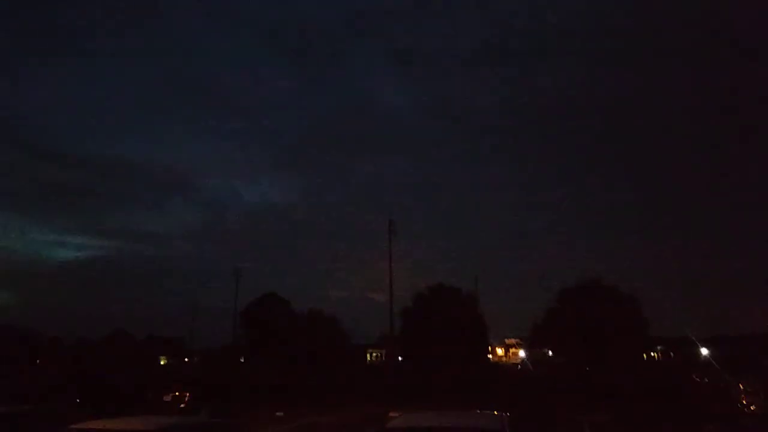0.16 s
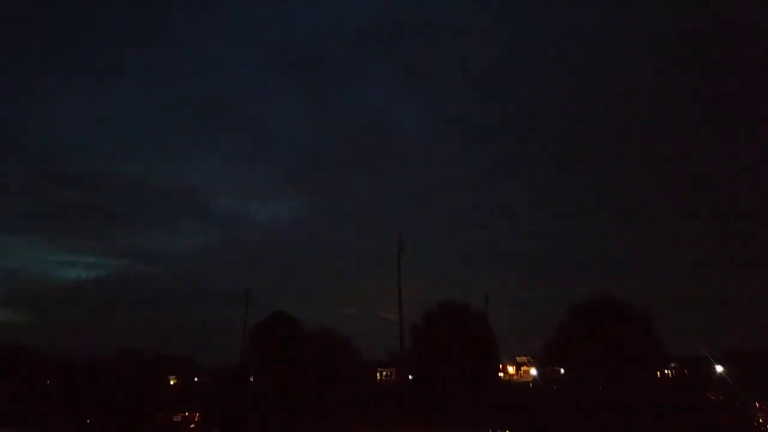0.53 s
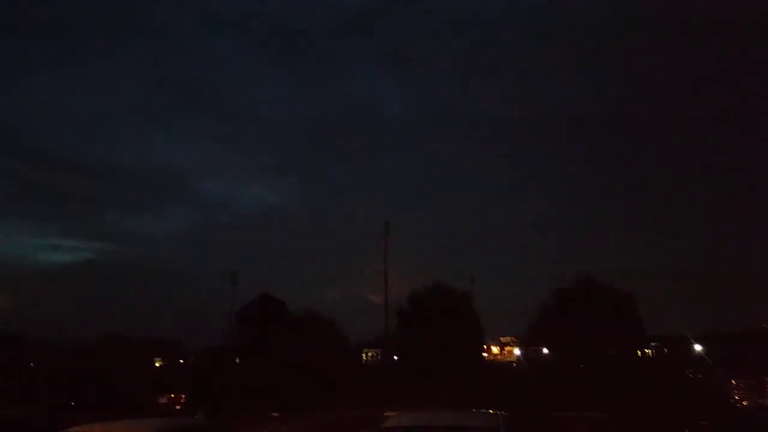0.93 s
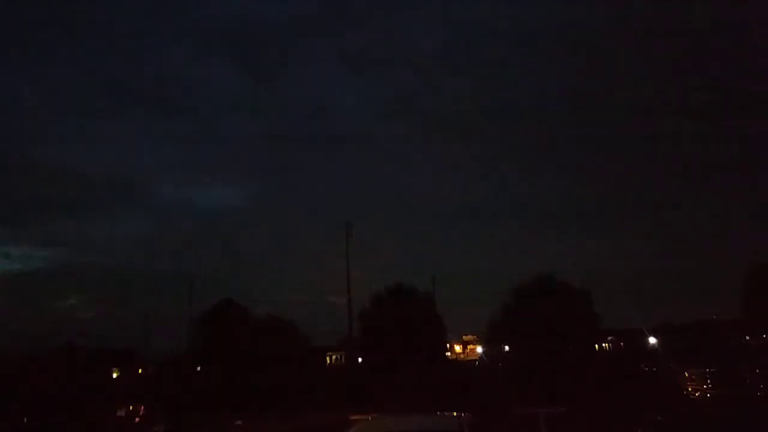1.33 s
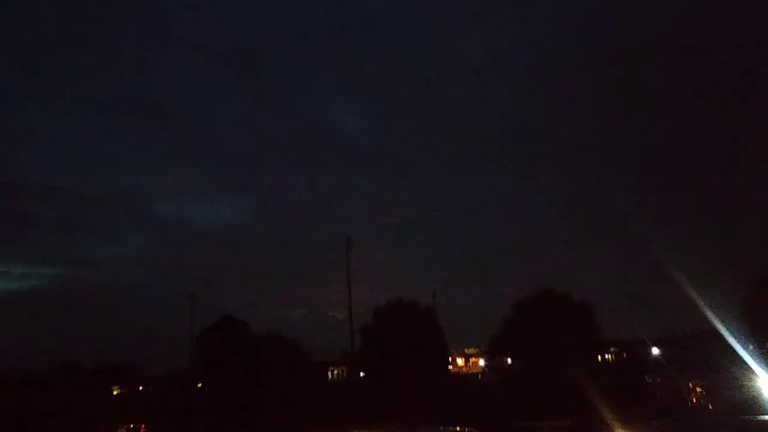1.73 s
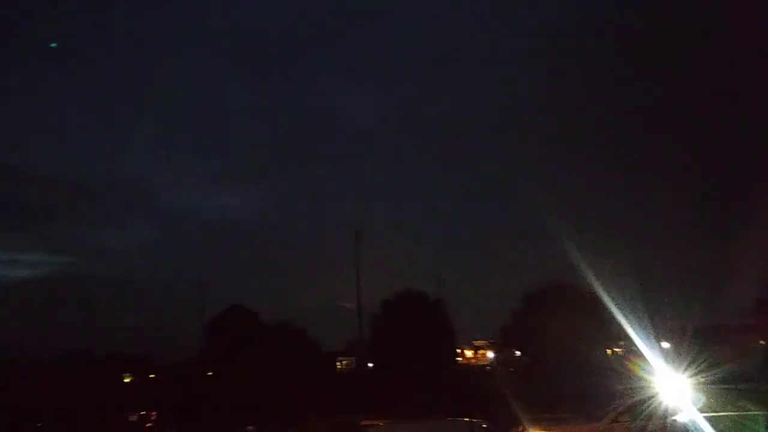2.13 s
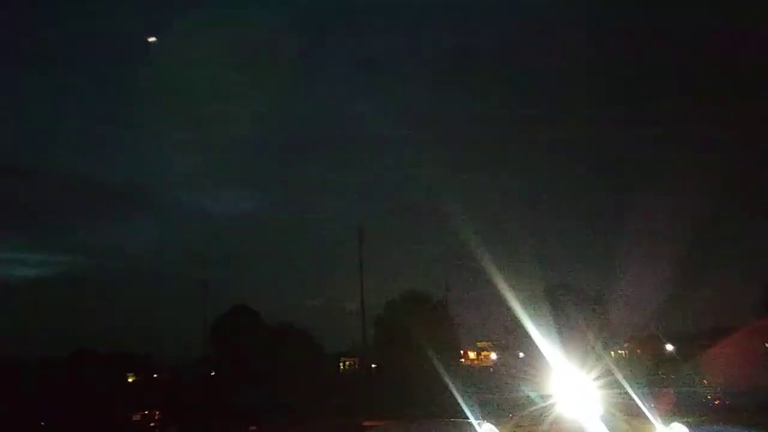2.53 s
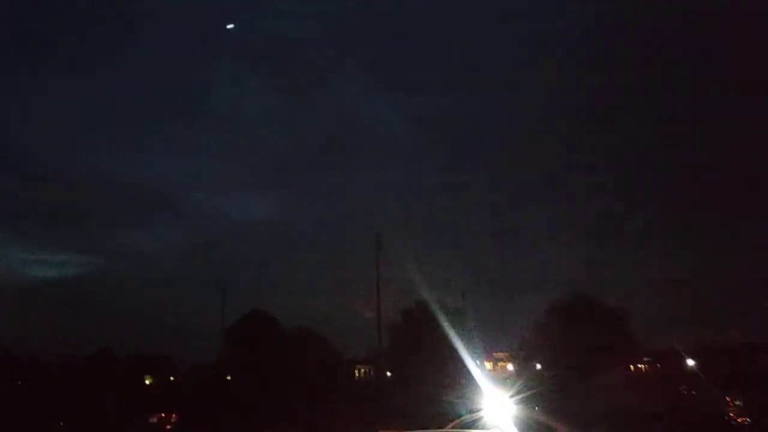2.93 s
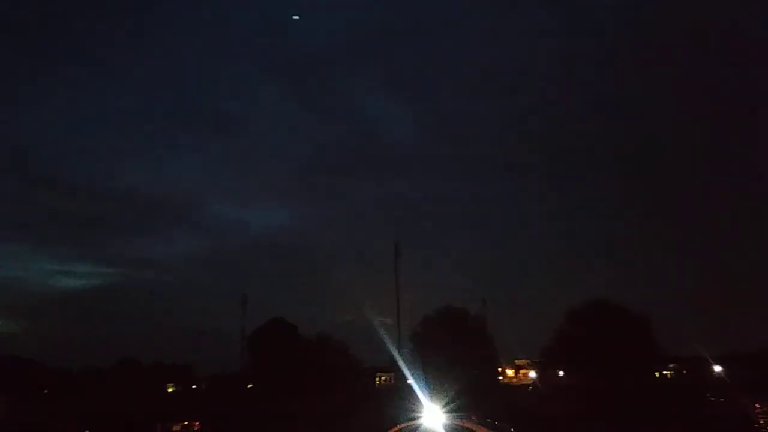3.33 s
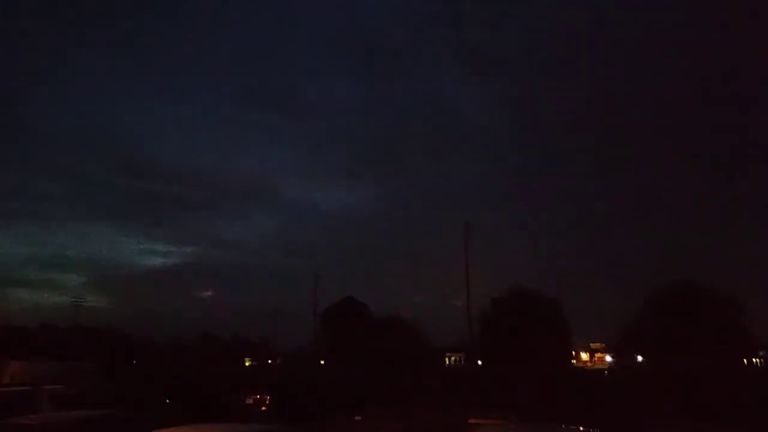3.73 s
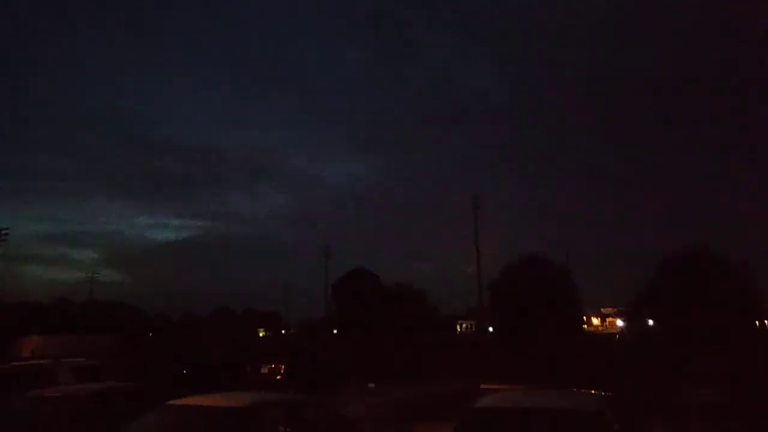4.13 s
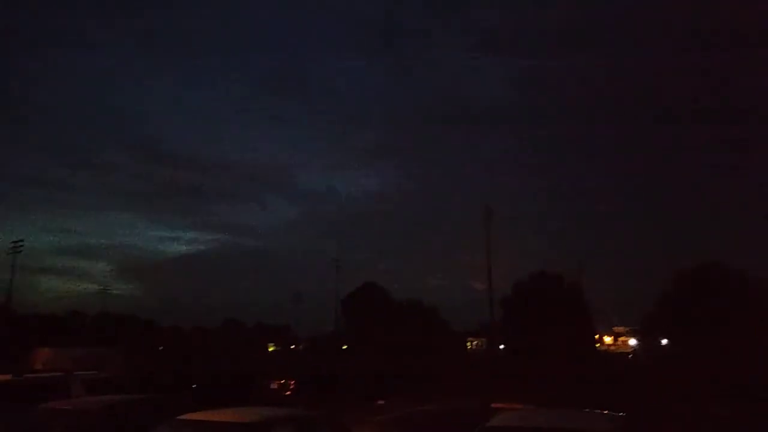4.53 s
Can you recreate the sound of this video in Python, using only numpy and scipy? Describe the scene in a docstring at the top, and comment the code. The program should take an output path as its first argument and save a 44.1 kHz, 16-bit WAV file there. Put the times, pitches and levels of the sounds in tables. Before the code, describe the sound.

Night insects fill the open air with a steady high shrill and short, pulsing cricket trills. Far traffic murmurs very low beneath them. A few small, sharp handling clicks come early. Near the end a brief crackly rustle and an insect buzz are followed by the loudest sound, a short scraping crack right on the microphone, after which the chorus continues dulled.

```python
"""A far chorus of crickets and katydids shrills at dusk over a faint town hum and calls, likely frogs.
The insects stridulate, drawing a scraper over a file on the wing; one katydid buzzes twice close by.
A hand-held camera bumps, rustles and ticks as contacts excite the modes of its casing. Near the end
something, probably a fingertip, scrapes across the microphone port in stick-slip motion with a sharp
crack and stays there, muffling the night."""
import sys
import numpy as np
from scipy import signal
from scipy.fft import rfft, irfft, next_fast_len
from scipy.io import wavfile
from scipy.ndimage import uniform_filter1d

SR = 44100
rng = np.random.default_rng(int(sys.argv[2]) if len(sys.argv) > 2 else 0)


def pcm_store(signal):
    """Save signal as 16-bit PCM."""
    levels = np.round(np.clip(np.atleast_2d(signal), -1, 1) * 32767)
    wavfile.write(sys.argv[1], SR, levels.astype(np.int16).T)


N = 205991
TIME = np.arange(N) / SR
COVER_S = 4.26  # the port starts to close


def undb(db):
    """Decibels to amplitude ratio."""
    return 10 ** (np.asarray(db) / 20)


def unit(x):
    """Normalisation to rms 1."""
    return x / np.sqrt(np.mean(x ** 2) + 1e-20)


def gains(table):
    """Interpolation in time: one gain curve for each dB column of a table."""
    s, *columns = np.transpose(table)
    return [undb(np.interp(TIME, s, column)) for column in columns]


def colour(x, points):
    """Minimum-phase filter through (frequency_hz, gain_db) points, by folding the cepstrum."""
    size = next_fast_len(N // 2 + SR // 4) * 2
    hz, db = np.transpose(points)
    bins_hz = np.maximum(np.fft.rfftfreq(size, 1 / SR), 1)
    cepstrum = irfft(np.log(undb(np.interp(np.log(bins_hz), np.log(hz), db))))
    cepstrum[1:size // 2] *= 2
    cepstrum[size // 2 + 1:] = 0
    return irfft(rfft(x, size) * np.exp(rfft(cepstrum)))[:N]


def band(x, low_hz, high_hz, order=4):
    """Band-pass filter, normalised to rms 1."""
    sos = signal.butter(order, [low_hz, high_hz], "band", fs=SR, output="sos")
    return unit(signal.sosfilt(sos, x))


def noise():
    """White noise."""
    return rng.standard_normal(N)


def walk(per_s):
    """Smooth random modulation of rms 1, turning about per_s times a second."""
    step = max(int(SR / per_s), 1)
    return unit(uniform_filter1d(noise()[np.arange(N) // step], step))


def grains(per_s, scatter_db):
    """Shot noise: random impulses of uneven size."""
    return unit((rng.random(N) < per_s / SR) * np.sign(noise()) * undb(scatter_db * noise()))


def tone(hz):
    """A sinusoid whose phase is the integral of its frequency."""
    return np.sin(2 * np.pi * np.cumsum(hz) / SR)


def swell(centre_s, length_s):
    """A bell-shaped envelope."""
    return np.exp(-(2 * (TIME - centre_s) / length_s) ** 2)


def ramp(start_s, length_s):
    """A linear rise from 0 to 1."""
    return np.clip((TIME - start_s) / length_s, 0, 1)


def burst(start_s, t60_s, attack_s=0.0022):
    """A quick attack and an exponential decay."""
    return ramp(start_s, attack_s) * undb(-60 * np.maximum(TIME - start_s, 0) / t60_s)


def notes(table, bend_hz):
    """Tones under bell-shaped envelopes, sharing one frequency modulation."""
    out = np.zeros(N)
    for centre_s, length_s, pitch_hz, level_db in table:
        on = np.abs(TIME - centre_s) < 1.5 * length_s
        out[on] += undb(level_db) * swell(centre_s, length_s)[on] * tone(pitch_hz + bend_hz[on])
    return out


def resonator(x, hz, t60_s):
    """Forced response of a damped oscillator whose natural frequency moves."""
    turn = np.exp(2j * np.pi * np.cumsum(hz) / SR)
    pole = undb(-60 / (t60_s * SR))
    return (signal.lfilter([1], [1, -pole], x / turn) * turn).imag


def struck(modes, age_s, detune):
    """Free vibration after an impact: a sum of damped modes, each randomly detuned."""
    out = 0
    for mode_hz, level_db, t60_s in modes:
        hz = mode_hz * (1 + detune * rng.standard_normal())
        out += undb(level_db - 60 * age_s / t60_s) * np.sin(2 * np.pi * hz * age_s)
    return out


def outdoors(x, wet_db, t60_s):
    """Scattering from trees and houses adds a diffuse, decaying tail."""
    t = TIME[:SR // 2]
    tail = noise()[:len(t)] * undb(-60 * t / t60_s)
    return x + undb(wet_db) * signal.fftconvolve(x, tail / np.linalg.norm(tail))[:N]


def town():
    """Far traffic sums incoherently to a low murmur, beside a machine's tonal hum and a faint hiss."""
    # traffic spectrum: frequency_hz, gain_db
    murmur = [(15, -51.5), (25, -26), (112, -8.5), (240, -5.5), (262, -11.5), (301, -4), (429, -10.5),
              (579, -13), (691, -16.5), (1070, -15), (1240, -21.5), (1380, -23.5), (1700, -22), (2210, -46),
              (3740, -120)]
    # partials of the machine: pitch_hz, level_db
    partials = [(118.4, -71.5), (236.9, -65.5)]
    traffic = unit(colour(noise(), murmur)) * undb(-61.5 + 0.43 * walk(6.7))
    hum = sum(undb(db) * np.sqrt(2) * tone(hz + .5 * walk(4.34)) for hz, db in partials)
    return traffic + hum + undb(-66) * band(noise(), 1300, 3080, order=2)


def far_calls(peep_count=36, peep_db=-67, flutter_db=3, waver_hz=45):
    """Random modulation roughens short calls and fainter peeps; reverberation blurs them."""
    # far calls, likely frogs: centre_s, length_s, pitch_hz, level_db
    calls = [(0.127, 0.29, 1430, -57.5), (.47, 0.25, 1420, -59), (.59, .04, 600, -60),
             (1.642, 0.09, 561, -53), (1.78, 0.051, 516, -54), (1.89, 0.04, 620, -60),
             (2.047, 0.086, 1582, -57), (2.45, 0.035, 912, -57), (2.602, 0.057, 1397, -51),
             (2.71, 0.043, 1440, -60), (2.876, 0.023, 1430, -57), (3.197, 0.035, 1053, -54),
             (3.23, 0.047, 322, -52), (3.416, 0.064, 1068, -62), (3.54, 0.021, 1610, -58),
             (4.59, 0.045, 318.7, -51.5), (4.644, 0.032, 581, -47.5)]
    peeps = [(when * TIME[-1], .04, 1750 - 850 * low ** 2, peep_db + 5 * near)
             for when, low, near in rng.random((peep_count, 3))]
    voices = notes(list(calls) + peeps, waver_hz * walk(220))
    flutter = unit(undb(flutter_db * walk(170)))
    return outdoors(voices * flutter, wet_db=-6, t60_s=0.35)


def cricket_choir(carrier_hz, spread_hz, hoarse_hz, strokes_per_s, uneven_db, singers=5):
    """Stridulation: each singer has its own pitch, modulated by wing strokes and short uneven chirps."""
    out = 0
    for place in np.linspace(-1, 1, singers):
        stroke_hz = strokes_per_s * (1 + .15 * rng.standard_normal() + .25 * walk(40))
        stroke = (np.cumsum(stroke_hz) / SR + rng.random()) % 1
        bend_hz = 30 * walk(18) + hoarse_hz * walk(260) - 40 * (stroke - .5)
        chirps = undb(uneven_db * np.tanh(1.3 * walk(18)) - 3 * abs(place))
        throb = .2 + np.sin(np.pi * stroke)
        out += throb * chirps * tone(carrier_hz + spread_hz * place + bend_hz)
    far = outdoors(out, wet_db=-7, t60_s=.12)
    return far / np.sqrt(uniform_filter1d(far ** 2, SR // 8) + 1e-12)  # holds the level steady


def crickets(swell_db=1.2, swells_per_s=9):
    """Common modulation: five choirs follow one effort, the high ones most, and each swells a little."""
    # how eagerly the crickets sing: time_s, effort_db
    eagerness = [(0, 5), (.25, 5), (.75, 0), (1.15, -1.5), (1.55, -1.5), (2.15, -2), (2.88, 1), (2.98, -7),
                 (3.64, -11.5), (3.72, 1.5), (4.15, -1), (4.6, 0)]
    # choirs: carrier_hz, spread_hz, hoarse_hz, strokes_per_s, uneven_db, level_db, db_per_effort_db
    choirs = [(1919, 100, 38, 52, 8.5, -53.5, 0.14), (2347, 110, 30, 66, 15, -59.7, .5),
              (2614, 125, 27.44, 51, 13.5, -60.5, 0.47), (3126, 280, 40, 57, 15, -59.7, 1.06),
              (3670, 240, 41, 58, 16, -67, 1.36)]
    effort, = gains(eagerness)
    return sum(undb(db + swell_db * walk(swells_per_s)) * effort ** by_effort * cricket_choir(*choir)
               for *choir, db, by_effort in choirs)


def near_crickets(strokes_per_s=57, hoarse_hz=32, waver_hz=30, sag_hz=60, uneven_db=2.0):
    """Single crickets trill above the choirs: each wing stroke radiates a pulse of sagging pitch."""
    # trills: centre_s, length_s, pitch_hz, level_db
    trills = [(0.064, 0.049, 3430, -66), (0.218, .12, 3260, -51.5), (0.316, 0.4, 2736, -53),
              (0.422, 0.085, 2290, -51), (0.597, 0.18, 3253, -55), (0.636, 0.11, 1883, -49),
              (0.724, .05, 2420, -55), (0.823, .06, 3290, -58), (0.988, .1, 2330, -61),
              (1.09, .07, 3140, -55), (1.09, .06, 2410, -56), (1.198, 0.096, 2330, -51.5),
              (1.212, 0.064, 3720, -57), (1.31, 0.036, 3470, -59), (1.379, .07, 2670, -55),
              (1.469, 0.054, 3090, -57), (1.643, .05, 2990, -54), (1.66, 0.051, 3350, -63),
              (1.775, .08, 2360, -53), (1.812, 0.16, 2663, -52.5), (1.969, .05, 2650, -56.5),
              (2.104, 0.16, 2340, -53), (2.112, .035, 3100, -53), (2.189, 0.24, 2657, -53),
              (2.237, 0.048, 3570, -62), (2.272, 0.12, 3270, -61), (2.346, .05, 1960, -47),
              (2.511, 0.17, 2324, -50.5), (2.537, 0.109, 3260, -56.5), (2.56, .08, 3120, -63),
              (2.751, 0.036, 2704, -50), (2.82, .06, 2490, -54), (2.865, 0.16, 2660, -51.5),
              (3.08, 0.051, 3420, -64), (3.091, 0.1, 2640, -56.5), (3.39, .06, 2630, -60),
              (3.481, .06, 2420, -63), (4.02, .05, 2600, -59), (4.02, .1, 3450, -58),
              (4.153, .07, 2600, -58)]
    stroke = np.cumsum(strokes_per_s * (1 + .2 * walk(40))) / SR % 1
    bend_hz = waver_hz * walk(18) + hoarse_hz * walk(260) - sag_hz * (stroke - .5)
    throb = np.sqrt(2) * unit((.2 + np.sin(np.pi * stroke)) * undb(uneven_db * walk(30)))
    return outdoors(notes(trills, bend_hz) * throb, wet_db=-7, t60_s=.12)


def katydids_and_fizz(throb_db=0.4):
    """Superposition: below 11 kHz countless file-tooth strikes merge into the katydids' shrill.
    Above it a very faint high fizz comes and goes as the chorus brightens."""
    # course of the chorus: time_s, effort_db, brightness_db
    course = [(0, -2.5, -11.5), (.5, -1, -7.5), (.85, 0, -3), (1.9, 0, -2.5), (2.35, 0.5, 0),
              (2.7, 0.2, -0.7), (3.05, -2, 0.55), (3.55, -2, -0.5), (3.85, -6.5, 0.5), (4.2, -5.5, 0)]
    # spectrum ahead of the split into bands: frequency_hz, gain_db
    spectrum = [(2180, -44.5), (3700, -9), (3810, -24.5), (3950, -0.5), (4180, -1), (5380, -1),
                (7010, -1.5), (8700, -11.5), (10100, -13.5), (11200, -29.5), (13100, -50.5), (14200, -43),
                (15000, -46)]
    # four bands of shrill, then the fizz: low_hz, high_hz, level_db, db_per_effort_db, db_per_bright_db
    bands = [(4018, 4800, -52.5, 1.3, -0.31), (4747, 6048, -48.5, 1.1, 0), (6220, 8880, -48, 0, 1.0),
             (8750, 11000, -59.5, 0, 1.5), (10850, 13650, -65, 0, 5.5)]
    shot_noise = colour(grains(per_s=14000, scatter_db=2.0), spectrum) * undb(throb_db * walk(130))
    effort, brightness = gains(course)
    return sum(undb(db) * effort ** by_effort * brightness ** by_brightness
               * band(shot_noise, low_hz, high_hz, order=10)
               for low_hz, high_hz, db, by_effort, by_brightness in bands)


def near_katydid(carrier_hz=7720, fall_hz=1000, strokes_per_s=136, rasp_db=-18, wobble_hz=80):
    """A pulse train heard as a buzz: each wing stroke is a falling ping with the rasp of the file."""
    # buzzes: start_s, length_s, fade_s, first_db, last_db
    buzzes = [(.19, .225, .07, -54.5, -55.5), (3.642, 0.203, .012, -42, -36.5)]
    out = 0
    for start_s, length_s, fade_s, first_db, last_db in buzzes:
        stroke = np.cumsum((TIME > start_s) * strokes_per_s * (1 + .04 * walk(60))) / SR % 1
        pitch_hz = carrier_hz - fall_hz * (stroke - .5) + wobble_hz * walk(900)
        wing = np.sqrt(2) * tone(pitch_hz) + undb(rasp_db) * band(noise(), 7900, 8300, order=5)
        pings = 2 * np.sin(np.pi * stroke) ** 4 * wing * undb(walk(110))
        along = (TIME - start_s) / length_s
        edges = np.clip(np.minimum(along, 1 - along) * length_s / fade_s, 0, 1)
        out += pings * edges * undb(np.interp(along, [0, 1], [first_db, last_db]))
    return outdoors(out, wet_db=-7, t60_s=.11)


def hand_bumps():
    """Structure-borne sound: the hand bumps the camera, giving dull swells of low noise."""
    # bumps: centre_s, length_s, level_db
    bumps = [(0.238, 0.091, -54), (1.45, 0.092, -60), (1.81, 0.37, -61.5), (2.12, 0.17, -50.5),
             (2.625, 0.15, -59), (3.088, 0.11, -57), (4.38, 0.1, -51.5)]
    force = sum(undb(db) * swell(s, length_s) for s, length_s, db in bumps)
    return force * band(noise(), 97.5, 168, order=2)


def rustle(fade_after_s=0.3, sizzle_db=-43.5):
    """Decaying shot noise: a sudden grainy rustle of handling, with a thin spray of treble."""
    # hollow body and crisp top: start_s, low_hz, high_hz, level_db, t60_s
    layers = [(3.656, 480, 1860, -46.5, 0.48), (3.645, 1710, 3840, -45, 1.8)]
    # spectrum of a grain: frequency_hz, gain_db
    grain_spectrum = [(240, -62), (400, -29), (441, -9), (623, -37), (722, -9), (828, -5), (1010, -25),
                      (1280, 1), (1420, -1.5), (1480, -17), (1620, -17), (2440, -14), (2830, -13.5),
                      (4200, -23), (5460, -48), (9240, -120)]
    start_s = layers[0][0]
    crumple = colour(grains(per_s=2800, scatter_db=3.0), grain_spectrum)
    body = sum(undb(db) * burst(s, t60_s) * band(crumple, low_hz, high_hz)
               for s, low_hz, high_hz, db, t60_s in layers)
    spray = band(grains(per_s=2500, scatter_db=3), 4500, 9500, order=3)
    sizzle = undb(sizzle_db) * burst(start_s, t60_s=0.37) * spray
    return sizzle + body * (1 - ramp(start_s + fade_after_s, 0.064))


def rattle():
    """Impacts within the rustle excite hollow modes, each knock a little different in pitch."""
    # knocks: start_s, level_db
    knocks = [(3.6555, -37.5), (3.669, -38.5), (3.678, -42.5), (3.690, -37.5), (3.698, -44), (3.711, -41),
              (3.733, -52), (3.742, -50)]
    # modes of a knock: pitch_hz, level_db, t60_s
    modes = [(798, -6.5, 0.076), (1298, -0.5, 0.077), (2430, -8, 0.03)]
    return sum(undb(db) * struck(modes, np.clip(TIME - s, 0, 1), detune=0.036) for s, db in knocks)


def chirr(squeak_s=3.660, squeak_db=-30.5, fall_hz_per_s=28000):
    """Friction in the rustle: a falling squeak, then sparse catches that drive a sinking resonance."""
    # path of the resonance: time_s, pitch_hz, level_db
    glide = [(3.655, 2450, -75), (3.67, 2350, -44.5), (3.78, 2340, -49), (3.88, 2160, -50),
             (3.96, 1990, -50), (4.04, 1950, -80)]
    squeak_hz = 2300 - fall_hz_per_s * np.clip(TIME - squeak_s, -0.02, 0.02)
    squeak = undb(squeak_db) * swell(squeak_s, length_s=0.01) * tone(squeak_hz)
    s, hz, db = np.transpose(glide)
    catches = grains(per_s=260, scatter_db=2)
    ringing = resonator(catches, np.interp(TIME, s, hz) + 170 * walk(70), t60_s=0.017)
    envelope = undb(np.interp(TIME, s, db)) * (TIME > s[0]) * (TIME < s[-1])
    return squeak + band(ringing, 1730, 3200, order=3) * envelope


def ticks(crack_db=-10, crack_decay_s=.0005):
    """Impulse response of the casing: a tiny crack of contact, then its modes ring briefly."""
    # contacts and the band each excites: start_s, peak_db, low_hz, high_hz
    contacts = [(.829, -25.5, 4200, 6360), (0.8753, -23, 2930, 9800), (0.8841, -19, 1750, 10040),
                (1.776, -32.5, 5700, 7200)]
    # modes of the casing: pitch_hz, level_db, t60_s
    modes = [(1870, -1.5, 0.028), (3960, 3.5, 0.0075), (4000, 6.5, 0.0038), (6200, 5, 0.003),
             (8300, 7, 0.0042), (9300, -2, .002)]
    out = 0
    for start_s, peak_db, low_hz, high_hz in contacts:
        age_s = np.maximum(TIME - start_s, 0)
        ring = struck(modes, age_s, detune=.02)
        crack = undb(crack_db) * noise() * (age_s > 0) * np.exp(-age_s / crack_decay_s)
        tick = band(ring + crack + 1e-18, low_hz, high_hz, order=10)
        out += undb(peak_db) * tick / np.max(np.abs(tick))
    return outdoors(out, wet_db=-11, t60_s=.14)


def port(night, hiss_db=-55.5):
    """Transmission loss and resonance: once covered, the port shuts out the top and hisses near 3 kHz."""
    # response of the covered port: frequency_hz, gain_db
    response = [(100, -2), (1200, 1.5), (1950, -7), (2450, -10), (2900, -1), (3250, -2), (3800, -3.5),
                (4400, -4), (5200, -12), (5700, -33.5), (8000, -36.5)]
    cover = ramp(COVER_S, 0.014)
    hiss = undb(hiss_db) * band(noise(), 2910, 3290, order=2)
    return (1 - cover) * night + cover * (colour(night, response) + hiss)


def scrape(touch_s=4.185, slip_hz=180, rub_db=-1, grit_throb=0.058, grit_lead_s=0.0044):
    """Stick-slip friction of skin on the port: each slip thumps the cavity, amid a spray of grit."""
    # touch, first drag, main scrape, let-up, settling, last brush: centre_s, length_s, slip_db, grit_db
    pushes = [(4.194, .007, -23, -35), (4.213, .014, -38, -31.5), (4.242, 0.052, -14, -15.7),
              (4.276, 0.015, -37.5, -34.5), (4.32, 0.097, -39.5, -42), (4.39, .1, -59.5, -48)]
    # spectrum of the slips: frequency_hz, gain_db
    slip_spectrum = [(29, -68), (60, -36.5), (125, -18), (195, -6), (340, -1), (430, -6.5), (545, -3.5),
                     (837, -15), (892, -14.5), (1130, -25), (1240, -17), (1730, -21), (2200, -21.5),
                     (2860, -40.5), (4840, -120)]
    # spectrum of the skin's grit: frequency_hz, gain_db
    grit_spectrum = [(530, -22), (900, -6), (1130, -4), (1470, -8.5), (1750, -12), (2000, -4.5), (2660, -4),
                     (3760, -3), (4180, -1), (5500, -1.5), (5980, -1), (15500, -33.5)]
    cycles = np.cumsum(slip_hz * (1 + .3 * walk(420))) / SR
    slips = np.diff(np.floor(cycles), prepend=0) * undb(0.92 * walk(180))
    # as the port closes the slips give way to a smooth rub and the grit turns dull
    closed = ramp(COVER_S, 0.025)
    friction = unit(slips) * (1 - .5 * closed) + undb(rub_db) * noise()
    thumps = unit(colour(friction, slip_spectrum))
    # evened over a few slips, so that the force follows the pressure of the finger
    thumps /= np.sqrt(uniform_filter1d(thumps ** 2, SR // 60) + 1e-9)
    spray = grains(per_s=7500, scatter_db=0) * (1 + grit_throb * np.cos(2 * np.pi * cycles))
    slip_gain = sum(undb(db) * swell(s, length_s) for s, length_s, db, _ in pushes)
    grit_gain = sum(undb(db) * swell(s - grit_lead_s, length_s) for s, length_s, _, db in pushes)
    grit = unit(colour(spray, grit_spectrum)) * grit_gain
    dull = signal.sosfilt(signal.butter(4, 4400, fs=SR, output="sos"), grit) + undb(-12.5) * grit
    return ramp(touch_s, 0.012) ** 2 * (thumps * slip_gain + (1 - closed) * grit + closed * dull)


def scene():
    """Superposition: the night passes through the port; contact sounds add directly."""
    night = katydids_and_fizz() + crickets() + near_crickets() + near_katydid() + far_calls() + town()
    return (port(night) + ticks() + hand_bumps() + rustle() + rattle() + chirr() + scrape())[None]


def record(dry):
    """Band limiting: the camera drops the deep bass and cuts the top."""
    bass_hz, top_hz = 55, 15700
    thin = signal.sosfilt(signal.butter(3, bass_hz, "high", fs=SR, output="sos"), dry)
    return signal.sosfilt(signal.ellip(10, .2, 80, top_hz, fs=SR, output="sos"), thin)


dry = scene()
out = record(dry)
pcm_store(out)
```